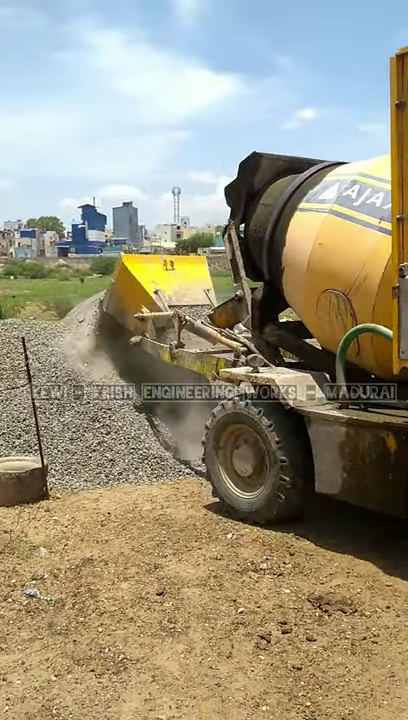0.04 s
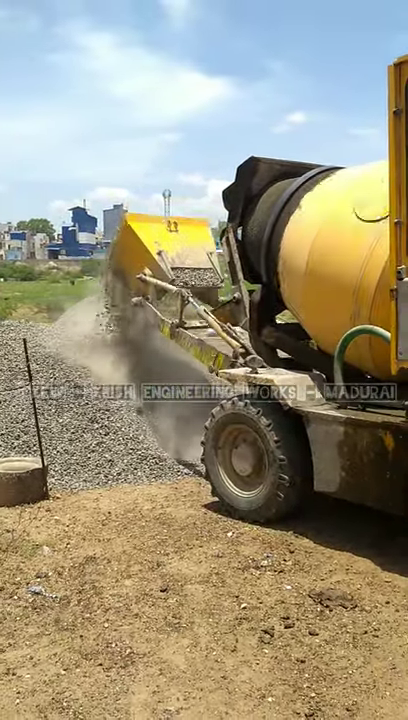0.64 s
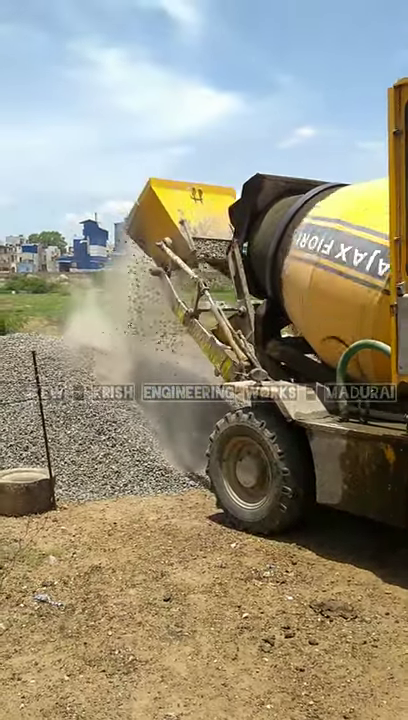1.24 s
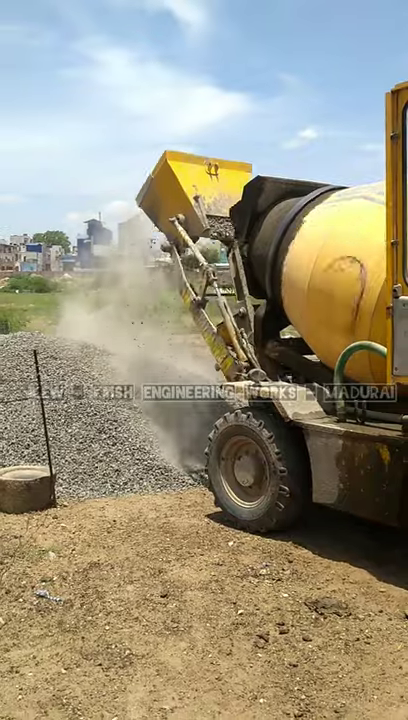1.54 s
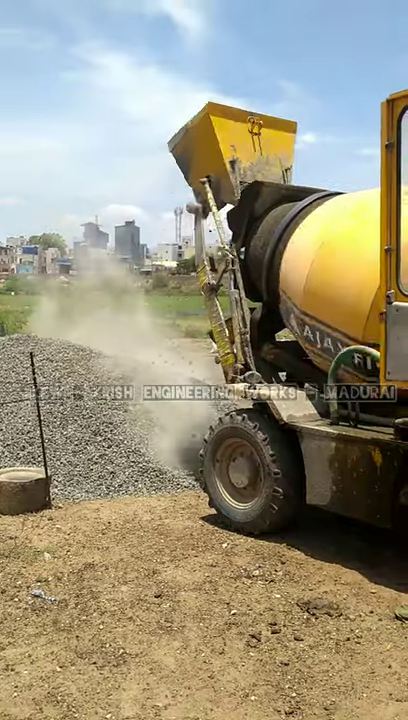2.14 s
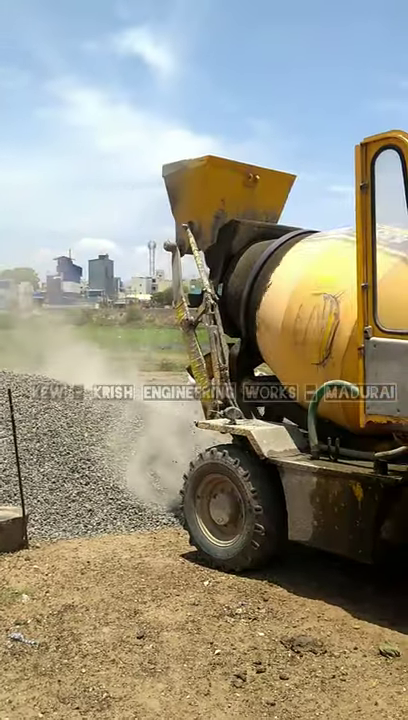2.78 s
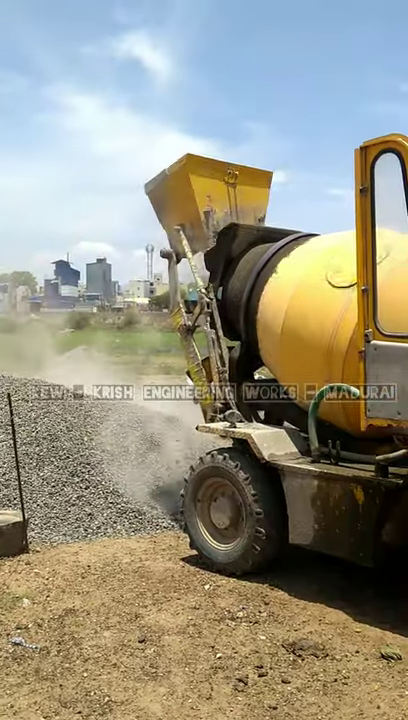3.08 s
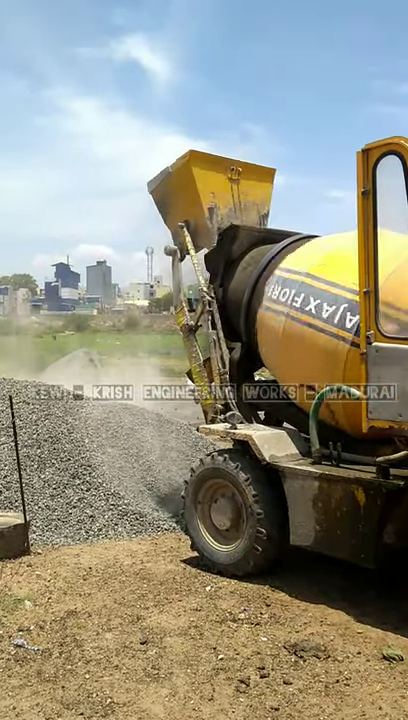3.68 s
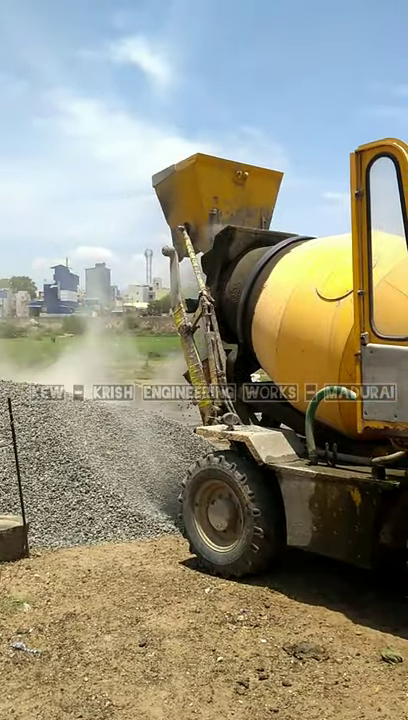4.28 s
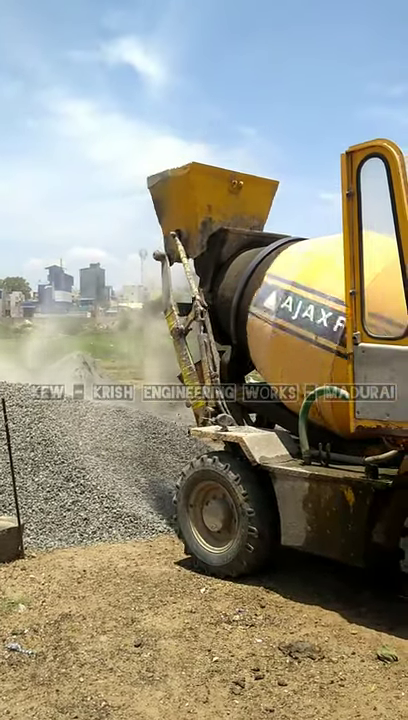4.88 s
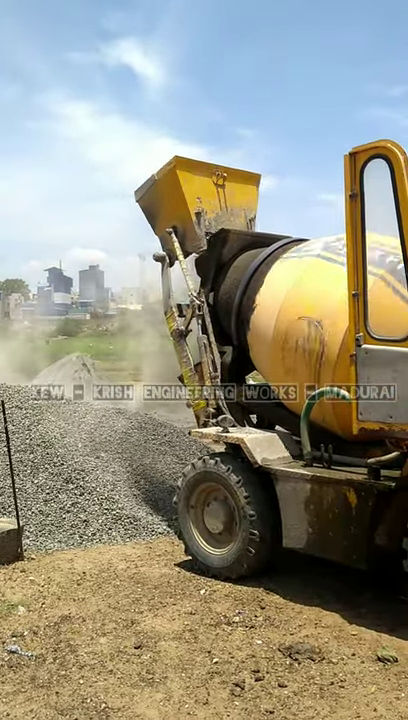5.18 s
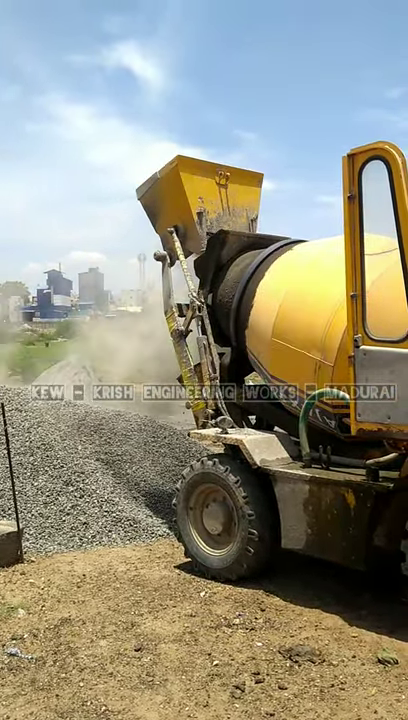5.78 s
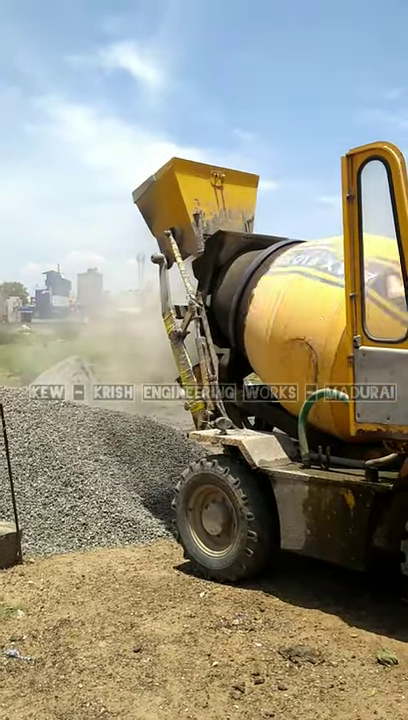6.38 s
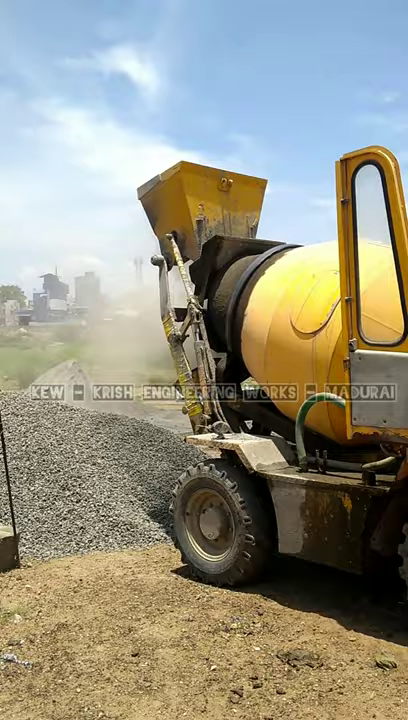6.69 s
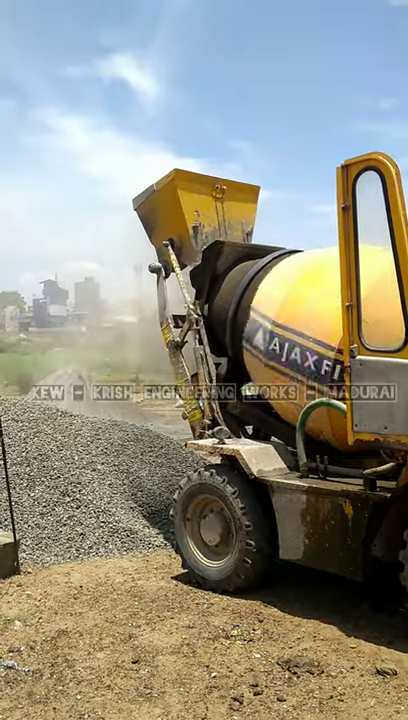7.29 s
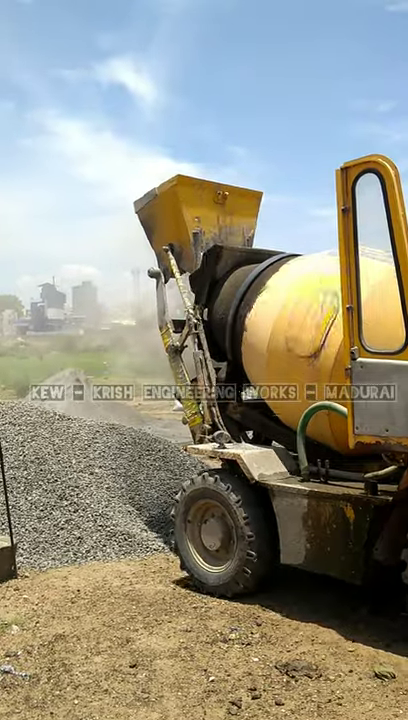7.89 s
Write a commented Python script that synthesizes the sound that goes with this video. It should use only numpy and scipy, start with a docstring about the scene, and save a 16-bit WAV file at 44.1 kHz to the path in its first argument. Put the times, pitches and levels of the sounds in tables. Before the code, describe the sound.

A loud diesel mixer engine drones and clatters outdoors, then gravel pours into its turning steel drum with a surging, rattling rush.

```python
"""An open gravel yard, where a self-loading concrete mixer runs its diesel at about 2500 rpm.
The four-cylinder engine drones, rumbles and clatters, and a hydraulic pump whines as the bucket rises.
Stones spill, then at about 2.5 s pour into the turning steel drum and rush round in surges,
their many small impacts merging into noise. A breeze buffets the two ports of a phone,
which forms its stereo picture by delay and subtraction."""
import sys
import numpy as np
from scipy import signal
from scipy.fft import rfft, irfft, next_fast_len
from scipy.io import wavfile
from scipy.ndimage import uniform_filter1d

SR = 44100
rng = np.random.default_rng(int(sys.argv[2]) if len(sys.argv) > 2 else 0)


def store_pcm(level_fs):
    """Save levels as 16-bit WAV."""
    pcm = np.round(np.clip(level_fs, -1, 1) * 32767).astype(np.int16)
    wavfile.write(sys.argv[1], SR, np.atleast_2d(pcm).T)


N = 354563
TIME = np.arange(N) / SR

# the drone, six waves per shaft turn, sagging as the drum takes up its load: time_s, pitch_hz
DRONE_PITCH = [(0, 253.8), (1.5, 253.9), (2.25, 253.8), (2.47, 255.4), (2.75, 252.5), (3, 254.4),
               (3.92, 253.3), (4.52, 254.6), (5.02, 252.2), (5.23, 254.2), (5.45, 252.3), (5.65, 253.3),
               (6.05, 251.8), (6.55, 252.9), (7.2, 251), (7.45, 252.8), (7.65, 247.5), (7.85, 250.6)]
# its strength, steady until the load drops in and then heaving with it: time_s, level_db
DRONE_LEVEL = [(0, -19.5), (2.1, -20), (2.38, -18), (2.82, -23.5), (3.4, -19), (3.92, -23), (4.45, -19),
               (4.8, -23), (5.1, -20), (5.32, -22.8), (5.65, -19.7), (6.05, -19), (6.28, -24.5),
               (6.55, -19.5), (6.82, -22.5), (7.5, -20), (7.8, -21), (8.04, -25.5)]
# the engine's harmonics (2 is the firing rate, 6 the drone): shaft_multiple, level_db
ENGINE_HARMONICS = [(2, -25.5), (4, -35.5), (6, 0.5), (12, -43), (21, -16.5)]
# hollow rumble, strongest while the full bucket is lifted: time_s, level_db
RUMBLE_LEVEL = [(0, -19), (.5, -16.5), (1.15, -19.5), (1.7, -18.5), (2.15, -21.5), (2.55, -19.5),
                (2.68, -26), (2.9, -21.5), (3.35, -19), (3.7, -22), (3.9, -19), (4.2, -23), (4.6, -20.5),
                (5.6, -21.5), (6, -19.5), (6.4, -20.5), (8, -21)]
# clatter of the engine and lifting gear: time_s, level_db
CLATTER_LEVEL = [(0, -19.5), (.25, -18), (.65, -17.5), (.8, -19.5), (1.1, -19), (2, -21.5), (2.4, -21),
                 (8, -21)]
# the pump, working hardest while the bucket rises: time_s, level_db
PUMP_LEVEL = [(0, -35), (.25, -25.5), (.9, -36), (1.25, -29), (1.9, -35), (2.3, -31.5), (3, -38),
              (4.7, -35), (8, -47)]
# harmonics of its whine: shaft_multiple, level_db
PUMP_HARMONICS = [(9, -2), (18, -2), (27, -8), (38, -14), (40, -9)]
# stones trickling off the bucket: time_s, level_db
SPILL_LEVEL = [(0, -33), (.2, -28), (.65, -28.5), (1.1, -29.5), (1.5, -31.5), (2, -34), (2.3, -41),
               (3, -32)]
# gusts on the ports: crest_s, length_s, level_db
GUSTS = [(.63, .6, -36), (1.11, .16, -24), (1.42, .22, -28), (1.72, 0.73, -25), (2.35, 1.2, -30),
         (2.88, 0.33, -27), (3.25, 0.75, -38), (6.1, 1.3, -42)]
# single stones glancing off the machine: start_s, level_db, decay_s
CHINKS = [(.14, -14, .016), (.343, -17.5, 0.011), (1.565, -22, .008), (1.773, -22, .008),
          (1.99, -22.5, .018), (3.549, -21, 0.011), (5.111, -22, 0.012), (5.411, -20, 0.013),
          (5.48, -17, 0.013), (6.24, -18, 0.016)]
# knocks of the bucket, its arms and the load in the drum: start_s, level_db, decay_s
KNOCKS = [(1.332, -16, .009), (2.552, -12, .028), (2.738, -15, .012), (2.881, -7.5, .015),
          (3.033, -12, .011), (3.93, -14, .014), (6.054, -16, .012), (6.099, -14, .014)]
# the flow swells as gravel slides in, dips as it sticks: middle_s, length_s, swell_db, extra_hiss_db
SURGES = [(2.61, .28, 4.5, 0.5), (3.08, .4, -1.2, 0), (3.27, .14, 2, 1.5), (3.46, .26, 2.5, 0),
          (3.616, .2, 3, 2), (3.726, .16, -1, -1.5), (4.024, 0.49, 2.5, 1), (4.34, 0.45, .5, 3),
          (4.656, 0.21, 3.5, -0.5), (4.98, .14, 0, -4), (5.114, 0.32, 1, .5), (5.46, .24, 3.5, -0.5),
          (5.72, 0.26, 1, 1.5), (5.93, .2, -0.5, -3), (6.167, .34, 3.3, -0.5), (6.4, .12, -.5, -1.5),
          (6.544, 0.21, 1.5, 3.5), (6.72, .24, 1, 2.5), (7.26, .16, 2.5, -1), (7.5, 0.4, 3, -1.5),
          (7.75, 0.38, 1.5, 2.5), (7.97, 0.37, 0, 4.5)]
# the load landing in the drum: start_s, level_db, decay_s
LANDING = [(2.535, -20, 0.017), (2.556, -10.5, 0.017)]

# spectral envelopes: frequency_hz, density_db
RUMBLE_SPECTRUM = [(30, -28), (60, -27), (110, -13.5), (200, -10), (280, -5.5), (320, 0), (355, -1.5),
                   (400, -0.5), (440, -2), (480, 1), (520, -5.5), (570, -13), (800, -40), (2000, -68)]  # the engine's hollow body
CLATTER_SPECTRUM = [(300, -16.5), (520, -18), (610, -7.5), (740, -3.5), (920, 0), (1300, -7), (1800, -14),
                    (2400, -16.5), (3200, -17), (6000, -25), (10000, -36), (15000, -58)]  # engine and lifting gear
SPILL_SPECTRUM = [(1000, -11), (2400, -5), (3200, 0), (4400, -3.5), (5700, 1), (7700, -1.5), (10000, -6),
                  (13000, -13.5), (15000, -15)]  # trickling stones
BREEZE_SPECTRUM = [(25, -28), (55, -6), (85, -3), (125, 4), (190, -5), (300, 4.5), (600, -30), (1500, -58)]  # wind on the ports
CHINK_SPECTRUM = [(2200, -11), (3200, -5), (4500, 0), (5900, 1.5), (7200, -7), (9000, -11.5), (15000, -28)]  # a glancing stone
KNOCK_SPECTRUM = [(100, -20), (300, 1), (450, 0), (600, -7), (950, -5), (1600, -12), (4000, -30),
                  (10000, -50)]  # heavy parts knocking
TUMBLE_SPECTRUM = [(150, -26), (400, -11), (600, -5.5), (900, -1.5), (1200, -0.5), (1550, -6.5), (1950, -6),
                   (2400, -17.5), (4000, -20)]  # the tumbling mass
STRIKE_SPECTRUM = [(1200, -16.5), (2000, -4.5), (2600, -2.5), (3400, 2), (3900, 0.5), (4500, -2),
                   (6000, -21), (10000, -43)]  # stones on bare steel
HISS_SPECTRUM = [(3000, -27), (4300, -11), (5100, 2.5), (5800, 3), (6600, -4), (7600, -9), (9000, -13),
                 (11000, -20.5), (13000, -36), (15000, -37)]  # hiss at the drum's mouth

# the phone's stereo response: frequency_hz, side_minus_mid_db, far_port_share
PORT_RESPONSE = [(50, 8, 0), (120, -0.5, 0.11), (220, -8, 0.07), (510, -6.5, 0), (710, -9, 0.5),
                 (1150, -1, 0.86), (2180, -6, 1), (3400, 2.5, 0.86), (4560, -4.5, 0.54), (5700, 0.5, 0.66),
                 (7450, -2.5, 0.05), (10000, 0.5, 0.23), (13600, -2, 0.06)]
# its channel balance: frequency_hz, left_minus_right_db
BALANCE = [(60, -1), (200, 5), (370, 1.5), (700, 3), (1300, -0.2), (4000, -.5)]


def undb(db):
    """Amplitude ratio: a factor of ten for every 20 dB."""
    return 10 ** (np.asarray(db) / 20)


def curve(rows):
    """Linear interpolation of a table in time."""
    return np.interp(TIME, *np.array(rows).T)


def over_hz(rows, freq, column=1):
    """Linear interpolation of one column in log frequency."""
    rows = np.array(rows)
    return np.interp(np.log(freq), np.log(rows[:, 0]), rows[:, column])


def spectrum(x):
    """Fourier transform with zero padding: frequencies and bins."""
    size = 2 * next_fast_len(N // 2 + 2048)
    return np.maximum(np.arange(size // 2 + 1) * SR / size, 1), rfft(x, size)


def unit(x):
    """Normalisation to rms 1."""
    return x / np.sqrt(np.mean(x ** 2))


def colour(x, points):
    """Source and filter: a body imposes its spectrum, rolling off beyond the table's ends; rms 1."""
    freq, bins = spectrum(x)
    ends = 1 / (1 + (points[0][0] / freq / 2) ** 4) / (1 + (freq / points[-1][0] / 2) ** 4)
    return unit(irfft(bins * undb(over_hz(points, freq)) * ends)[..., :N])


def noise():
    """Uncorrelated white noise for mid and side."""
    return rng.standard_normal((2, N))


def waver(per_s):
    """Random modulation: per_s values a second, joined by straight lines; rms 1."""
    return unit(np.interp(TIME * per_s, np.arange(8192), rng.standard_normal(8192)))


def swell(crest, length):
    """A raised-cosine pulse, from 0 to 1 and back."""
    return np.cos(np.pi * np.clip((TIME - crest) / length, -.5, .5)) ** 2


def harmonics(turns, table, waver_db, waver_rad):
    """Rotation gives partials at multiples of the shaft speed, each wavering in level and phase."""
    tone = 0
    for multiple, db in table:
        order = round(multiple)
        looseness = .15 if order == 6 else 1  # the main drone is the steadiest
        phase = 2 * np.pi * order * turns + looseness * waver_rad * waver(18)
        tone = tone + np.sqrt(2) * undb(db + looseness * waver_db * waver(14)) * np.sin(phase)
    return tone


def drone(turns, throb_db=0.75, side_db=-8, octave_side_db=-7):
    """Amplitude modulation: the engine's harmonics heave and throb once the drum is loaded."""
    gain = undb(curve(DRONE_LEVEL) + tipped() * throb_db * waver(9))
    mid = harmonics(turns, ENGINE_HARMONICS, waver_db=4.0, waver_rad=.3)
    phase = 2 * np.pi * 6 * turns
    # the drone and its octave reach the two ports unequally
    side = undb(side_db) * np.sin(phase) + undb(octave_side_db) * np.sin(2 * phase)
    return gain * np.array([mid, np.sqrt(2) * side])


def firings(turns, repeat_share, depth, decay_share):
    """The four-stroke cycle: four bursts per two turns, their rattle part periodic and part random."""
    cycle = turns / 2 % 1
    pattern = rng.standard_normal((2, 2048))
    periodic = pattern[:, (cycle * pattern.shape[1]).astype(int)]
    strength = undb(1.5 * rng.standard_normal(1024))[(2 * turns).astype(int) % 1024]
    burst = 1 + depth * strength * np.exp(-(2 * turns % 1) / decay_share)
    lope = 1 + 0.034 * np.sin(2 * np.pi * cycle)
    return (np.sqrt(repeat_share) * periodic + np.sqrt(1 - repeat_share) * noise()) * burst * lope


def pump(turns):
    """Pressure ripple: the nine-piston hydraulic pump whines at shaft harmonics, in the mid only."""
    whine = undb(curve(PUMP_LEVEL)) * harmonics(turns, PUMP_HARMONICS, waver_db=5.0, waver_rad=0.11)
    return np.array([whine, np.zeros(N)])


def engine(hunt_hz=.4):
    """Forced vibration: one shaft sets the pace of drone, pump, rumble and clatter."""
    pitch_hz = curve(DRONE_PITCH) + hunt_hz * waver(8)  # the governor hunts
    turns = np.cumsum(pitch_hz) / SR / 6
    soft_bursts = firings(turns, repeat_share=0.11, depth=0.31, decay_share=0.2)
    hard_bursts = firings(turns, repeat_share=0.23, depth=0.5, decay_share=0.36)
    rumble = colour(soft_bursts, RUMBLE_SPECTRUM) * undb(curve(RUMBLE_LEVEL))
    clatter = colour(hard_bursts, CLATTER_SPECTRUM) * undb(curve(CLATTER_LEVEL))
    return drone(turns) + pump(turns) + rumble + clatter


def stones(per_s, spread_db):
    """A Poisson process of contacts: many small impulses and a few large."""
    hit = rng.random((2, N)) < per_s / SR
    size = undb(spread_db * np.minimum(rng.exponential(size=N), 5))
    return unit(hit * size * np.sign(noise()))


def spill():
    """Shot noise: stones falling off the bucket merge into a bright trickle."""
    return colour(stones(per_s=7000, spread_db=2.5), SPILL_SPECTRUM) * undb(curve(SPILL_LEVEL))


def breeze(draught_db=-46, flutter_db=2.5, side_db=7):
    """Turbulent pressure: a draught and gusts push on the two ports, mostly in opposition."""
    wind = undb(draught_db) + sum(undb(db) * swell(at, length) for at, length, db in GUSTS)
    buffeting = colour(noise(), BREEZE_SPECTRUM) * wind * undb(flutter_db * waver(20))
    return buffeting * undb([[0], [side_db]])


def impacts(rows, body, rise_s):
    """Damped vibration: each blow is a noise burst in a body's spectrum, decaying exponentially."""
    envelope = 0
    for start, db, decay in rows:
        age = np.clip(TIME - start, 0, 1)
        envelope = envelope + undb(db) * (1 - np.exp(-age / rise_s)) * np.exp(-age / decay)
    return colour(noise(), body) * envelope


TIP_S, TIP_RISE_S = 2.322, 0.22  # the bucket starts to tip; its flow builds up


def tipped():
    """A linear ramp, 0 to 1: how far the flow from bucket to drum has opened."""
    return np.clip((TIME - TIP_S) / TIP_RISE_S, 0, 1)


def pour_levels(slip_db=0.82, cushion_db_per_s=0.2, spread_s=0.75):
    """Common modulation: one surging flow drives the levels of tumbling, strikes and hiss."""
    age = np.maximum(TIME - TIP_S, 0)
    surge_db = slip_db * waver(16) + sum(db * swell(at, length) for at, length, db, _ in SURGES)
    spray_db = sum(db * swell(at, length) for at, length, _, db in SURGES)
    tumble_db = -20.5 + 0.75 * surge_db - cushion_db_per_s * age  # the growing bed cushions it
    strike_db = -24.5 + surge_db
    hiss_db = -25.5 + surge_db + spray_db - 8 * np.exp(-age / spread_s)  # builds as the stream spreads
    return tumble_db, strike_db, hiss_db


def pour():
    """Granular flow: gravel tumbles in the drum, striking steel and hissing at the mouth in clumps."""
    tumble_db, strike_db, hiss_db = pour_levels()
    clumps = undb(0.96 * waver(50))
    tumble = colour(stones(per_s=7000, spread_db=1.5), TUMBLE_SPECTRUM) * undb(tumble_db)
    strikes = colour(stones(per_s=8000, spread_db=2.5), STRIKE_SPECTRUM) * undb(strike_db)
    hiss = colour(stones(per_s=9000, spread_db=3.0), HISS_SPECTRUM) * undb(hiss_db)
    rattle = drum_ring(clumps * (strikes + hiss), decay_s=0.008, direct_db=-2, ring_db=0.8)
    return tipped() * (tumble + rattle)


def drum_ring(contacts, decay_s, direct_db, ring_db, places=16):
    """Reverberation between steel walls: each place of contact has its own short impulse response."""
    age = TIME[:SR // 25]
    place = rng.integers(0, places, N // 64 + 1).repeat(64)[:N]
    ring = 0
    for k in range(places):
        tail = rng.standard_normal(len(age)) * np.exp(-age / decay_s)
        share = uniform_filter1d((place == k) * 1., size=24)
        ring = ring + signal.oaconvolve(contacts * share, tail[None] / np.linalg.norm(tail))[:, :N]
    return undb(direct_db) * contacts + undb(ring_db) * ring


def ports(mid_side, travel_s=0.0004435):
    """Comb filtering: each port has the other's delayed sound subtracted, giving left and right."""
    freq, (mid, side) = spectrum(mid_side)
    far_share = np.clip(over_hz(PORT_RESPONSE, freq, column=2), 0, .97)
    far = far_share * np.exp(-2j * np.pi * freq * travel_s)
    to_mid, to_side = 1 - far, (1 + far) * undb(over_hz(PORT_RESPONSE, freq))
    total = np.hypot(abs(to_mid), abs(to_side))  # the phone evens out the total power
    mid, side = mid * to_mid / total, side * to_side / total
    lean = undb(over_hz(BALANCE, freq) / 2)
    return irfft(np.array([(mid + side) * lean, (mid - side) / lean]))[:, :N]


def scene():
    """Superposition: all sources add as mid and side and are picked up as left and right."""
    chinks = impacts(CHINKS, CHINK_SPECTRUM, rise_s=0.00085)
    knocks = impacts(KNOCKS, KNOCK_SPECTRUM, rise_s=0.0015)
    landing = impacts(LANDING, STRIKE_SPECTRUM, rise_s=0.0037)
    return ports(engine() + spill() + chinks + knocks + pour() + landing + breeze())


def record(dry):
    """Clipping and band limiting: the phone caps the peaks and cuts the treble above 15 kHz."""
    clipped = np.clip(dry, -.93, .93)
    return signal.sosfilt(signal.ellip(10, .2, 80, 15000, fs=SR, output="sos"), clipped)


dry = scene()
out = record(dry)
store_pcm(out)
```